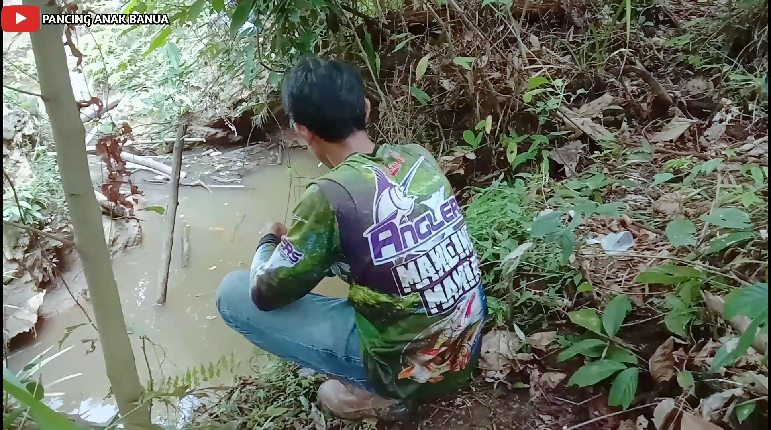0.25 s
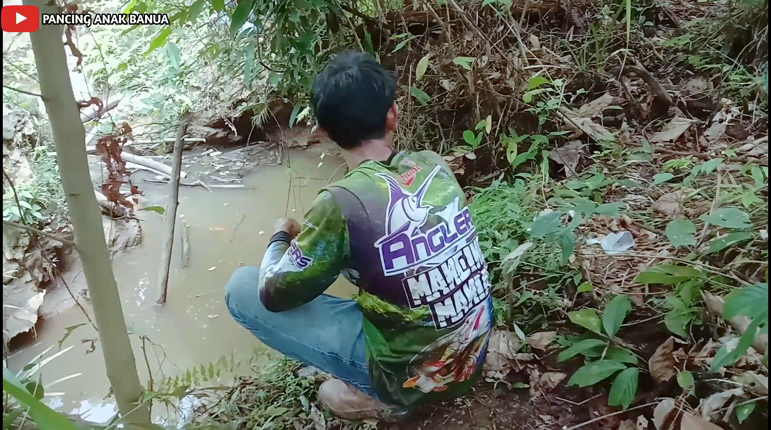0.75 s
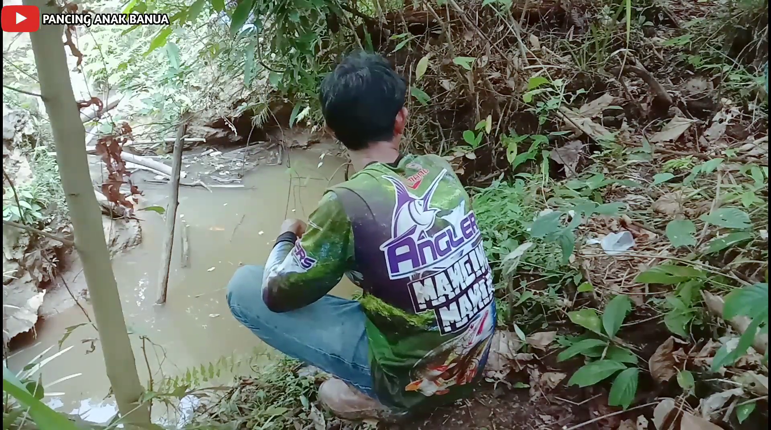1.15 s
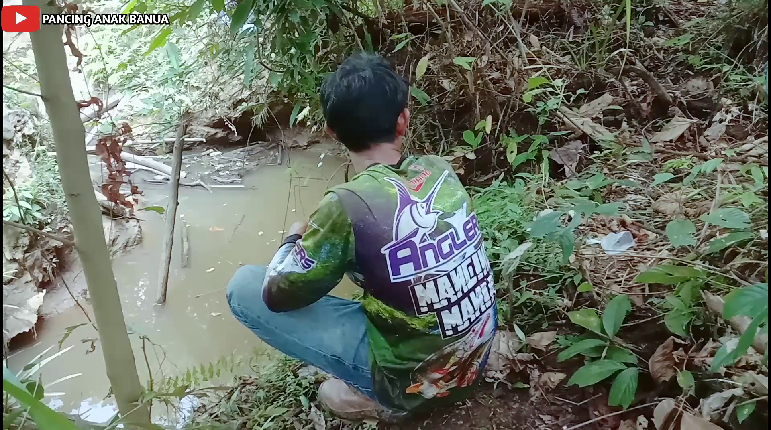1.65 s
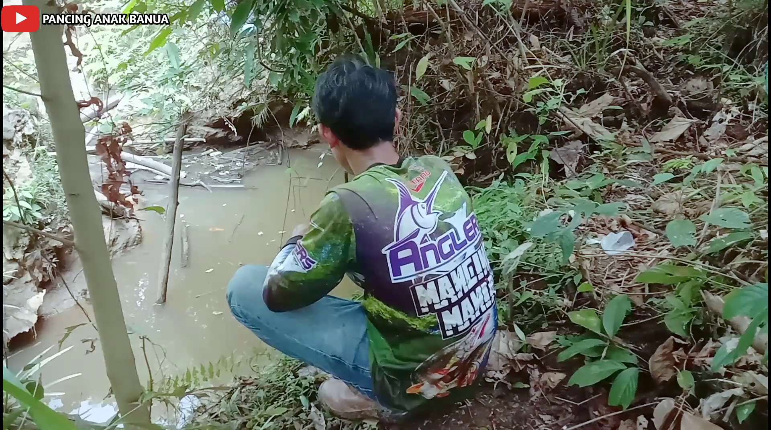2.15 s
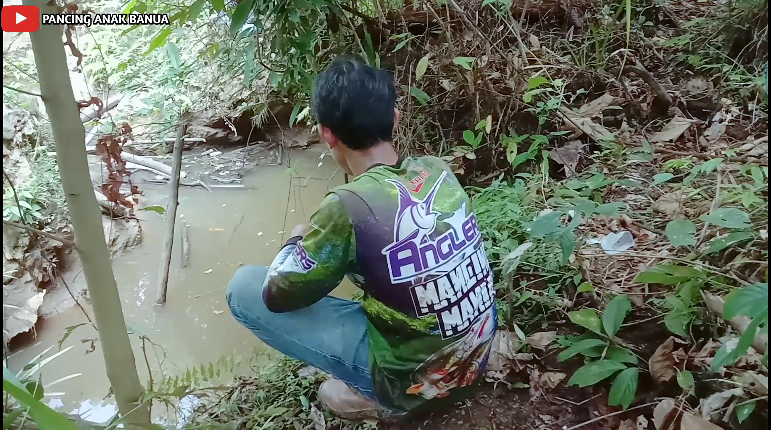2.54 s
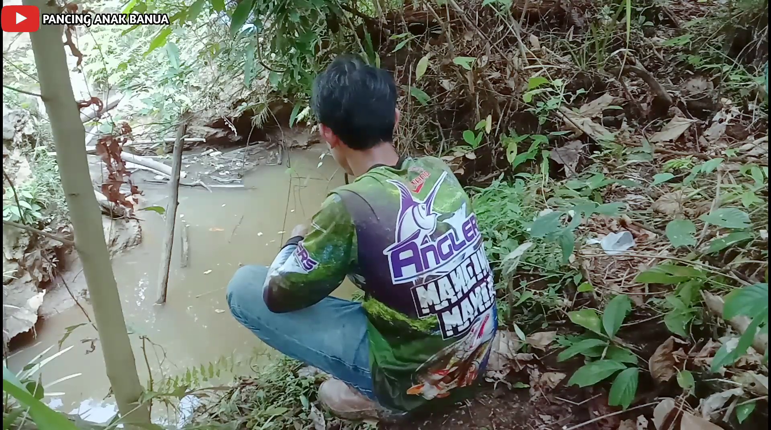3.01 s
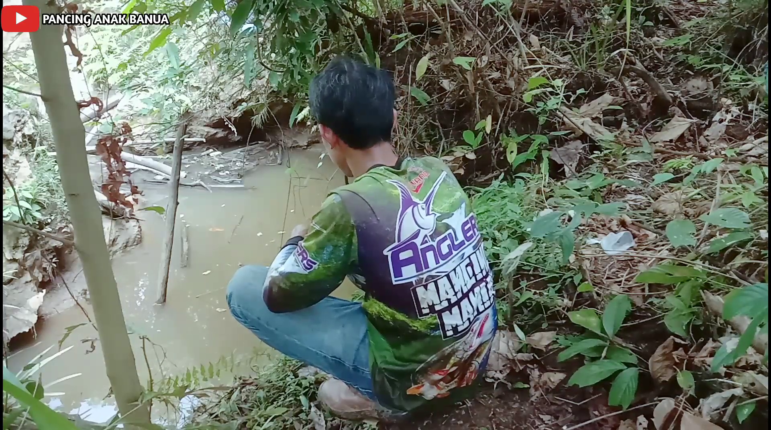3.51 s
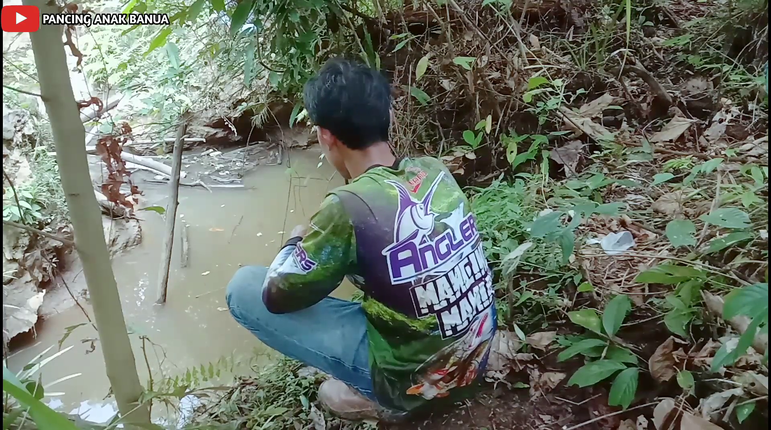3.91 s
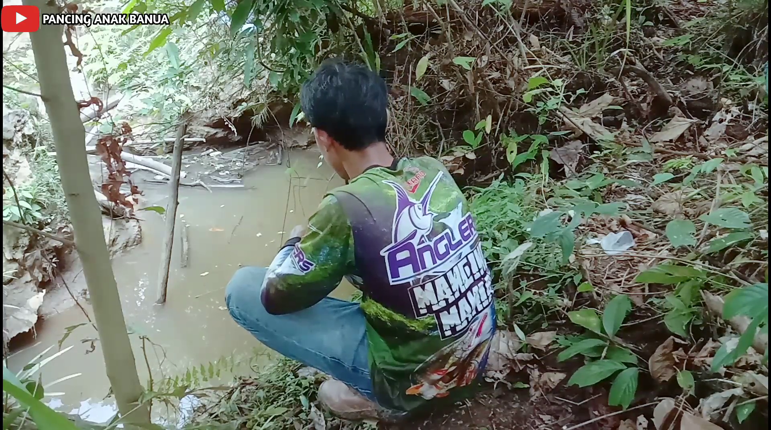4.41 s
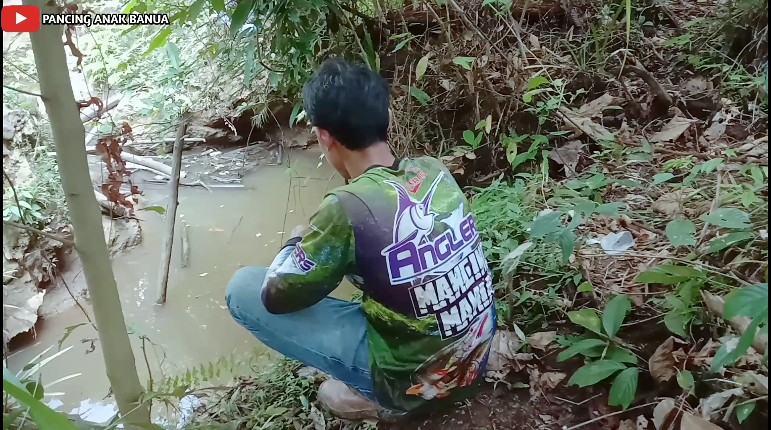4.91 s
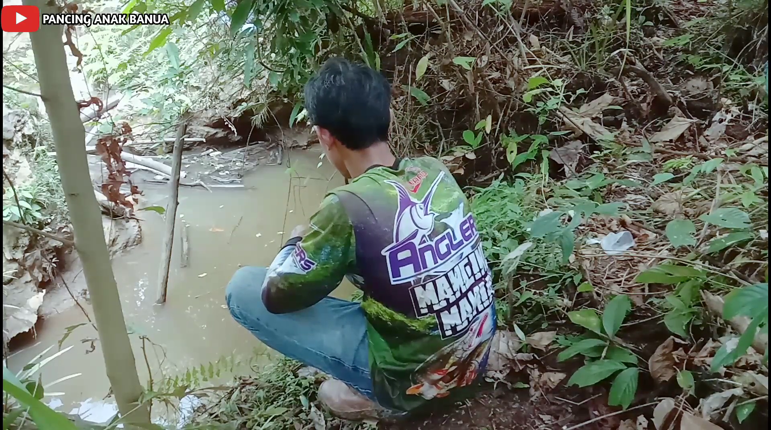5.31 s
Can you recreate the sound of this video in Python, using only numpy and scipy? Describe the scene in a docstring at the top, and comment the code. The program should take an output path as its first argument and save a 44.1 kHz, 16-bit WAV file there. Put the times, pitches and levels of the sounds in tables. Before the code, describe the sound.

Outdoors on a wooded stream bank, a shrill insect chorus drones throughout over very faint water murmur. Near the start, fishing gear snaps with a sharp, bright click, followed by short scuffs and snaps of dry leaves. A cicada buzzes and stutters from about one second to two, a small bird chips once midway, and another cicada buzzes more strongly at the end. The microphone is fairly close to the click, with insects diffused around it.

```python
"""A forest stream bank: slow water murmurs as filtered noise with sine bubbles, and insects drone near 7 kHz as
blurred click trains. Far cicadas hold thin sines, a far animal chirps low, a faint hum comes and goes. A bird
chips once in slurred sines. At the start a crouching angler's gear clicks as struck modes, and he shifts in the
dry leaves, whose slips are dense tiny impulses. Two nearer cicadas each give one buzzing, stuttering call:
harmonic tymbal partials under body resonances."""
import sys
import numpy as np
from scipy import signal
from scipy.fft import rfft, irfft
from scipy.io import wavfile

SR = 44100
rng = np.random.default_rng(int(sys.argv[2]) if len(sys.argv) > 2 else 0)


def int16_out(signal):
    """Quantize to a 16-bit WAV file."""
    q = np.round(np.clip(np.atleast_2d(signal).T, -1, 1) * 32767)
    wavfile.write(sys.argv[1], SR, q.astype(np.int16))


N = 245186
T = np.arange(N) / SR  # seconds

# Spectrum of the water's murmur. Each row: frequency in Hz, relative gain in dB.
STREAM_SPECTRUM = [(25, -15), (50, -12), (79, -0.5), (129, 0), (248, -6.5), (328, -6.5), (454, -9.5),
                   (576, -10.5), (656, -13), (888, -13.5), (1030, -15), (1250, -9.5), (1520, -16),
                   (4400, -20.5), (5720, -17.5), (9680, -120)]
# Distinct bubbles in the water. Each row: start in seconds, pitch in Hz, level in dB.
PLOPS = [(0.823, 444, -66), (2.511, 415, -62), (3.39, 900, -63.5), (3.742, 187, -68), (5.098, 904, -73),
         (5.19, 890, -66.5)]
# Spectrum of the diffuse sound, opposite on left and right. Each row: frequency in Hz, relative gain in dB.
SURROUND_SPECTRUM = [(25, -11.5), (90, -1), (160, 0), (400, -2), (900, -3.5), (1300, 1), (2500, -6.5),
                     (4500, -5.5), (6500, -27), (8500, -45.5), (10000, -22), (14000, -16.5)]
# Faint low hum. Each row: start in seconds, length in seconds, rms level in dB.
HUMS = [(1.772, 0.46, -72.5), (2.42, 0.25, -68.5)]
# Spectrum of the chorus's joint song. Each row: frequency in Hz, relative gain in dB.
CHORUS_SPECTRUM = [(4700, -52), (5500, -38), (6050, -28), (6350, -10.5), (6650, -0.5), (6950, 1),
                   (7220, -0.5), (7520, -9.5), (7900, -28), (8800, -35), (9600, -57.5), (12200, -47.5)]
# Its overtone, an octave up. Each row: frequency in Hz, relative gain in dB.
OVERTONE_SPECTRUM = [(11500, -57), (12400, -36.5), (13150, -18), (13900, -7), (14300, -1), (15100, 8),
                     (15600, -6.5)]
# Thin notes of farther cicadas. Each row: start in seconds, length in seconds, pitch in Hz, level in dB.
FAR_NOTES = [(1.68, .42, 5500, -65.5), (1.5, 2.4, 5065, -73.5)]
# Far animal's chirps. Each row: time of full strength in seconds, level in dB.
CHIRPS = [(.83, -72), (.88, -67.5), (1.201, -73.5), (1.43, -75), (1.53, -71.5), (1.71, -72), (1.91, -71.5),
          (2.22, -72.5), (2.3, -77.5), (2.44, -71.5), (2.62, -71), (2.82, -73.5), (3.18, -67.5),
          (3.54, -69.5), (3.88, -71.5), (4.07, -73), (4.31, -68), (4.43, -76.5), (4.79, -69.5), (4.87, -68),
          (5.18, -74), (5.29, -71), (5.46, -69)]
# Slurred parts of the bird's chip. Each row: time of full strength in seconds, pitch in Hz, glide in Hz
# per second, level in dB.
CHIP = [(2.618, 1950, -12000, -67), (2.622, 2260, -3000, -54.5), (2.639, 2300, 5000.5, -60),
        (2.646, 2480, 29998.5, -60), (2.658, 2260, 8999, -66), (2.667, 2580, 0.5, -59.5),
        (2.677, 2280, -15000, -68)]
# Spectrum of the sliding leaves. Each row: frequency in Hz, relative gain in dB.
LEAF_SPECTRUM = [(100, -4), (300, -8), (600, -2.5), (900, -11), (1100, -4.5), (1255, 7), (1450, -7),
                 (2100, -1.5), (3000, 1), (4300, -2), (5250, -1), (5550, -8), (7000, -13), (10000, -17.5),
                 (14000, -27)]
# Dry leaves that snap. Each row: start in seconds, level in dB.
SNAPS = [(0.4708, -40), (0.4772, -45), (0.4947, -34), (.619, -51)]
# Scuffs in the leaves. Each row: time of full strength in seconds, attack in seconds, hold in seconds,
# level in dB, fall in dB per second, gain of the dull part in dB.
SCUFFS = [(0.337, 0.013, 0.016, -44.5, 190, 0), (0.429, 0.018, 0.017, -59, 203, 3),
          (0.469, 0.008, 0.013, -51, 300, 4.5), (0.615, 0.01, 0.069, -52, 260, -2.5)]
# Clicks of the gear. Each row: start in seconds, level in dB, dull knock relative to the bright modes in dB.
CLICKS = [(0.1575, -36, -20), (.1655, -41, -2), (0.1702, -28, -19), (0.172, -20, -10.5), (.1773, -32.5, -7),
          (0.1832, -32, -17), (0.1895, -42.5, 3), (.197, -41, -6), (.593, -40.5, -6)]
# Bright modes of the gear. Each row: frequency in Hz, relative level in dB, 60 dB decay time in seconds.
GEAR_MODES = [(2700, -2, 0.025), (3420, 2, 0.022), (3480, 8, 0.02), (3660, 4.5, 0.039), (4000, -17, 0.017),
              (4300, -18, .018)]
# Dull modes of its body. Each row: frequency in Hz, relative level in dB, 60 dB decay time in seconds.
KNOCK_MODES = [(320, -2, 0.02), (707, 2, .035), (880, -3, 0.034), (1226, -5, 0.054), (1950, -3, .012)]
# Spectrum of the rasp of a contact or a snap. Each row: frequency in Hz, relative gain in dB.
CRACK_SPECTRUM = [(500, -6), (1300, 0.5), (2000, -7), (2800, 7), (4400, -2), (5200, -10)]
# Resonances of the near cicadas' hollow abdomens. Each row: frequency in Hz, gain of the first caller in dB,
# gain of the second caller in dB.
ABDOMEN = [(850, -39, -51), (1600, -23.5, -18.5), (2440, -23, -25), (3265, -6, -8.5), (3420, -5.5, -18.5),
           (4200, -14.5, -19.5), (4246, -6.5, -9), (4680, -2.5, -5), (5130, 0, 0.5), (5350, -10, -8),
           (5650, -8, -2), (5930, -9.5, -9), (6700, -18, -19)]
# Syllables of the near cicadas: a rising lead-in, a clear note, then a rough stutter. Each row: start in
# seconds, length in seconds, nominal buzz rate in Hz, glide over the syllable in Hz, level in dB,
# roughness from 0 to 1, gain of the partials below the main resonance in dB.
FIRST_CALL = [(1.13, 0.0815, 834.5, 40.5, -52, 0.37, -1), (1.215, 0.086, 858, 7, -51.5, 0.18, 1.5),
              (1.302, 0.047, 820, -16, -56, 0.65, -5), (1.344, 0.061, 838, -4.5, -51, 0.57, -3),
              (1.425, 0.097, 804, -19.5, -56.5, 0.6, -6.5), (1.532, 0.075, 842, 26.5, -53, 0.3, -4),
              (1.63, 0.059, 805, -19.5, -57, 0.6, -1), (1.705, 0.053, 822, -18, -56, 0.84, -3.5),
              (1.787, 0.088, 798, -10.5, -63.5, 0.8, -0.5), (1.886, 0.043, 810, -0.5, -59.5, 0.8, -2),
              (1.963, 0.045, 824, -14.5, -56.5, 0.65, -1), (2.061, 0.045, 816, -10.5, -60, 0.85, -2.5)]
SECOND_CALL = [(4.869, 0.064, 833.4, 17.5, -51.5, 0.21, 4), (4.932, 0.13, 854.4, -1, -44.5, 0.047, 0.5),
               (5.065, 0.033, 846, -25, -56, 0.57, 8), (5.104, 0.058, 787, -31, -56, 0.73, 2.5),
               (5.182, 0.068, 796, -12, -56, 0.7, 0), (5.276, .06, 819, -24, -54, 0.57, 1),
               (5.374, 0.04, 822, -36.5, -52.5, 0.63, 2), (5.468, 0.057, 797, -35.5, -56.5, 0.76, -2)]

HUM_EDGE_S, FAR_EDGE_S = 0.18, 0.15
TRILL_HZ, TRILL_DB = 7206, -53  # a thin steady trill within the chorus
CHIRP_S, CHIP_S = 0.029, 0.0086  # Gaussian half-widths, at 1/e of full strength
SCUFF_SPLIT_HZ = 2100  # divides the dull from the bright part
MAIN_RESONANCE_HZ = 4500
SYLLABLE_EDGE_S, SYLLABLE_ARCH = 0.016, 0.0468  # the arch bends the rate, as a share of it
WAVER, WAVER_RATE = 0.024, 110  # share of the buzz rate at full roughness; changes per second
FLUTTER_DB = 2  # spread of each partial's level
# At full roughness: lead of the second tymbal as a share of the rate, and added length of the edges.
TYMBAL_SPLIT, RASP_BLUR_S = 0.0219, 0.03
TOP_HZ = 15420


def undb(db):
    """Amplitude gain is ten to the power of decibels over twenty."""
    return 10 ** (np.asarray(db) / 20)


def level(x, db):
    """Scaling by the root mean square fixes the mean power, here in decibels."""
    return x * undb(db) / np.sqrt(np.mean(x ** 2))


def noise():
    """White Gaussian noise holds equal power at all frequencies; its rms is 1."""
    return rng.standard_normal(N)


def walk(rate):
    """Low-passed noise drifts smoothly, about rate changes per second, with a spread of 1."""
    smoothing = np.exp(-(np.fft.rfftfreq(N, 1 / SR) / rate) ** 2)
    return level(irfft(rfft(noise()) * smoothing, N), 0)


def colour(x, points):
    """A filter shapes the spectrum through (Hz, dB) points and falls away beyond both ends."""
    hz, db = np.transpose(points)
    log_hz = np.log(np.fft.rfftfreq(N, 1 / SR) + 1)
    below = np.maximum(np.log(hz[0]) - log_hz, 0)
    above = np.maximum(log_hz - np.log(hz[-1]), 0)
    gain_db = np.interp(log_hz, np.log(hz), db) - 20 * (below + above)
    return irfft(rfft(x) * undb(gain_db), N)


def band(x, hz, width_hz):
    """A steep resonance passes only a band about its centre; the rms is set to 1."""
    f = np.fft.rfftfreq(N, 1 / SR)
    return level(irfft(rfft(x) / (1 + (2 * (f - hz) / width_hz) ** 4), N), 0)


def swell(start, length, edge):
    """A linear rise and fall, centred on the two ends, gates a sound softly."""
    rise = np.clip((T - start) / edge + 0.5, 0, 1)
    fall = np.clip((start + length - T) / edge + 0.5, 0, 1)
    return rise * fall


def forest(x, wet_db, t60):
    """Scattering by trunks and leaves adds a diffuse tail of exponentially decaying noise."""
    t = T[:SR]
    tail = rng.standard_normal(SR) * np.exp(-np.log(1000) * t / t60) * (1 - np.exp(-t / 0.0029))
    return x + undb(wet_db) * signal.fftconvolve(x, tail / np.linalg.norm(tail))[:N]


def linger(start, hz, width_hz, db, t60):
    """Scattering of a ringing sound leaves a narrow band of noise that decays exponentially."""
    age = np.maximum(T - start, 0)
    onset = 1 - np.exp(-age / 0.0055)
    return undb(db) * band(noise(), hz, width_hz) * onset * np.exp(-np.log(1000) * age / t60)


def clicks(rate, jitter, scatter_db):
    """A pulse train of wavering spacing and scattered strength, one click per whole cycle of phase."""
    phase = np.cumsum(rate * (1 + jitter * walk(rate))) / SR
    return np.diff(np.floor(phase), prepend=0) * undb(scatter_db * noise())


def modes(table, age):
    """A struck body sums damped sinusoidal modes; the peak is set to 1."""
    ring = sum(undb(db) * np.exp(-np.log(1000) * age / t60) * np.sin(2 * np.pi * hz * age)
               for hz, db, t60 in table)
    return ring / np.abs(ring).max()


def surround():
    """Diffuse sound, of opposite sign at left and right, is heard as a faint hush without direction."""
    side = level(colour(noise(), SURROUND_SPECTRUM), -73.0)
    return side * np.array([[1], [-1]])


def stream(count=60):
    """Turbulence murmurs as unsteady noise; each air bubble rings as a damped sine of slowly rising pitch."""
    murmur = level(colour(noise() * undb(1.2 * walk(23)), STREAM_SPECTRUM), -65.8)
    t, bubbles = T[:SR // 10], np.zeros(N + SR)
    small = [(when * N / SR, 130 * 8 ** size, -67 - 12 * strength)
             for when, size, strength in rng.random((count, 3))]
    for start, hz, db in PLOPS + small:
        at = int(start * SR)
        # the ring lasts some tens of cycles; the pitch rises as the bubble nears the surface
        ring = (1 - np.exp(-t / 0.00075)) * np.exp(-t * hz / 35) * (1 - t / t[-1])
        bubbles[at:at + len(t)] += undb(db) * ring * np.sin(2 * np.pi * hz * t * (1 + 0.33 * t))
    return murmur + bubbles[:N]


def hum():
    """Frequency modulation by a slow random drift makes a faint low tone waver."""
    gate = sum(undb(db) * swell(start, length, HUM_EDGE_S) for start, length, db in HUMS)
    return gate * np.sqrt(2) * np.sin(2 * np.pi * np.cumsum(171 + 3 * walk(8.4)) / SR)


def chorus(count=10):
    """Superposed click trains, each at its own rate and blurred by its own path, fuse into a drone."""
    song = sum(forest(clicks(rate, jitter=0.12, scatter_db=3.5), wet_db=2.5, t60=0.28)
               for rate in rng.uniform(180, 420, count))
    # the throb of the nearest insects, at two rates in Hz
    throb = 1 + sum(0.06 * np.sin(2 * np.pi * np.cumsum(hz + 0.3 * walk(1)) / SR) for hz in (18.1, 79))
    drone = level(colour(song, CHORUS_SPECTRUM), -37.0)
    flicker = undb(0.9 * band(noise(), 17, 10))
    overtone = level(colour(song, OVERTONE_SPECTRUM), -53.0) * flicker
    trill = undb(TRILL_DB) * band(noise(), TRILL_HZ, 20)
    return (drone + overtone) * throb + trill


def far_cicada():
    """Random frequency and amplitude modulation unsteadies thin held notes, which scattering blurs."""
    notes = np.zeros(N)
    for start, length, hz, db in FAR_NOTES:
        gate = swell(start, length, FAR_EDGE_S) * undb(db + 2.0 * walk(18))
        pitch = hz + 50 * walk(200) + 22 * walk(7.7)
        notes += gate * np.sin(2 * np.pi * np.cumsum(pitch) / SR)
    return forest(notes, wet_db=1.5, t60=0.29)


def chirps():
    """Gaussian pulses gate one wavering sine into a far animal's low chirps, which scattering smears."""
    note = np.sqrt(2) * np.sin(2 * np.pi * np.cumsum(1264 + 22 * walk(68.6)) / SR)
    gate = sum(undb(db) * np.exp(-((T - peak_s) / CHIRP_S) ** 2) for peak_s, db in CHIRPS)
    return forest(gate * note, wet_db=-2.5, t60=0.95)


def bird():
    """Overlapping gliding sines slur one rough chip from low to higher; scattering sustains the higher note."""
    waver = 1 + 0.03 * walk(300)
    chip = np.zeros(N)
    for peak_s, hz, glide, db in CHIP:
        pitch = (hz + glide * (T - peak_s)) * waver
        pulse = undb(db) * np.exp(-((T - peak_s) / CHIP_S) ** 2)
        chip += pulse * np.sin(2 * np.pi * np.cumsum(pitch) / SR)
    tail = linger(CHIP[-1][0], hz=2640, width_hz=220, db=-70.5, t60=0.54)
    return forest(chip, wet_db=-11.0, t60=0.16) + tail


def leaves():
    """Stick-slip friction of dry leaves and cloth gives dense tiny impulses; a few leaves snap."""
    slips = (rng.random(N) < 9000 / SR) * noise() * undb(1.5 * noise() + 2 * walk(220))
    slips = level(colour(slips, LEAF_SPECTRUM), 0)
    dull = signal.sosfiltfilt(signal.butter(4, SCUFF_SPLIT_HZ, fs=SR, output="sos"), slips)
    bright = slips - dull
    snap_gate = sum(undb(db) * (T > start) * np.exp(-np.abs(T - start) / 0.0012) for start, db in SNAPS)
    rustle = level(colour(noise(), CRACK_SPECTRUM), 0) * snap_gate
    for peak_s, attack, hold, db, fall, dull_db in SCUFFS:
        rise = np.exp(np.minimum(T - peak_s, 0) / attack)
        push = rise * undb(db - fall * np.maximum(T - peak_s - hold, 0))
        rustle = rustle + push * (bright + undb(dull_db) * dull)
    return forest(rustle, wet_db=-11.0, t60=0.7)


def gear():
    """Impact excites damped modes as a catch ticks, snaps home and rebounds: bright over a dull, rasping knock."""
    out = np.zeros(N)
    crack = level(colour(noise(), CRACK_SPECTRUM), -12.0)[:SR]
    for start, db, knock_db in CLICKS:
        age = np.maximum(T[:SR] - start, 0)
        contact = 1 - np.exp(-age / 0.00037)
        dull = modes(KNOCK_MODES, age) + 2 * crack * np.exp(-age / 0.0053)
        out[:SR] += undb(db) * contact * (modes(GEAR_MODES, age) + undb(knock_db) * dull)
    snap_s = max(CLICKS, key=lambda click: click[1])[0]  # the loudest click
    tail = linger(snap_s, hz=3700, width_hz=520, db=-49.0, t60=0.29)
    return forest(out, wet_db=-14.0, t60=0.32) + tail


def cicadas():
    """Abdomen resonances filter tymbal harmonics; with roughness a second tymbal detunes, beats and rasps."""
    body_hz, *bodies = np.transpose(ABDOMEN)
    # each tymbal wavers alone, and each of its eight partials flutters alone
    tymbals = [(walk(WAVER_RATE), [undb(FLUTTER_DB * walk(75)) for _ in range(8)]) for _ in range(2)]
    rasp = band(noise(), 4930, 480) + 0.4 * band(noise(), 5720, 330)
    out = np.zeros(N)
    for call, body in zip((FIRST_CALL, SECOND_CALL), bodies):
        for start, length, rate, glide_hz, db, rough, low_db in call:
            gate = swell(start, length, SYLLABLE_EDGE_S + RASP_BLUR_S * rough)
            on = gate > 0
            place = (T[on] - start) / length - 0.5  # 0 at mid-syllable
            shape = body + low_db * (body_hz < MAIN_RESONANCE_HZ)
            buzz = 0
            for (waver, flutter), lead, size in zip(tymbals, (0, 1), (1, rough)):
                unsteady = rough * (WAVER * waver[on] + TYMBAL_SPLIT * lead)
                hz = rate * (1 - SYLLABLE_ARCH * place ** 2 + unsteady) + glide_hz * place
                phase = 2 * np.pi * (np.cumsum(hz) / SR + rng.random())
                partials = sum(undb(np.interp(k * hz, body_hz, shape)) * np.sin(k * phase) * beat[on]
                               for k, beat in enumerate(flutter, 1))
                buzz += size * partials
            voice = level(buzz, 0) + 0.96 * rough * rasp[on]
            out[on] += gate[on] * level(voice, db)
    return forest(out, wet_db=-3.0, t60=0.35)


def scene():
    """Superposition places every source in the centre, within the faint diffuse hush."""
    background = stream() + hum() + chorus() + far_cicada()
    centre = background + chirps() + bird() + leaves() + gear() + cicadas()
    return centre + surround()


def record(dry):
    """An elliptic low-pass filter, as in a recorder, cuts the top steeply."""
    return signal.sosfilt(signal.ellip(12, 0.2, 80, TOP_HZ, fs=SR, output="sos"), dry)


dry = scene()
out = record(dry)
int16_out(out)
```